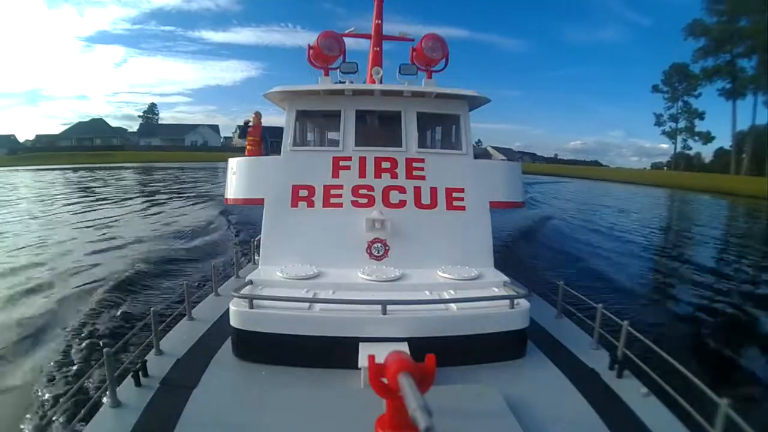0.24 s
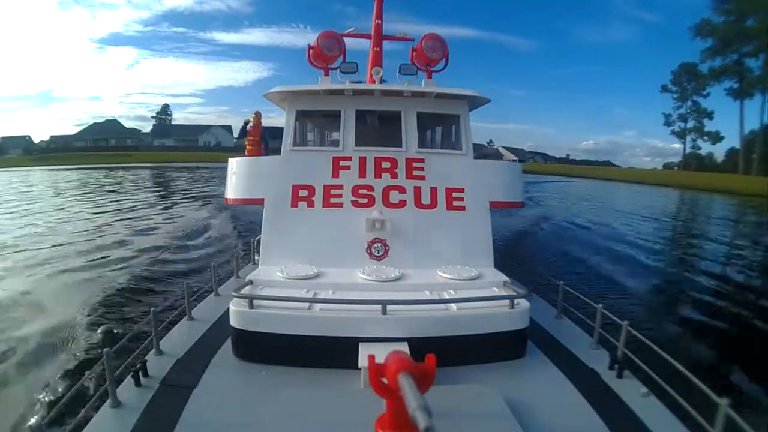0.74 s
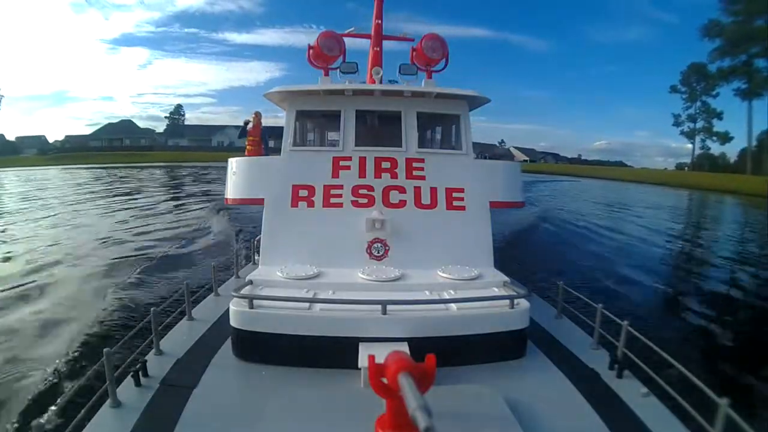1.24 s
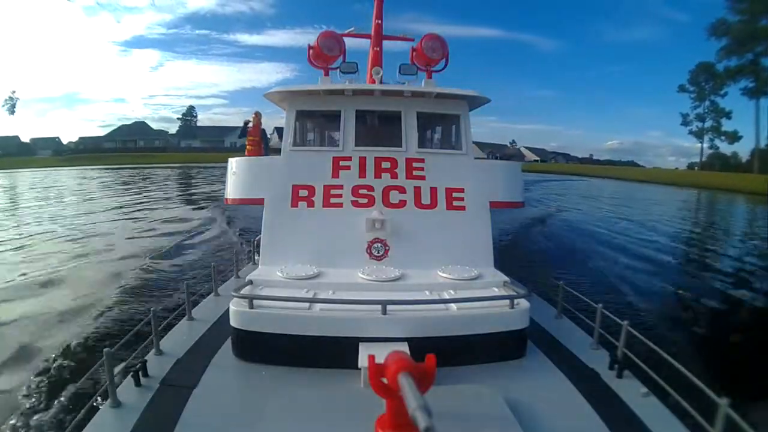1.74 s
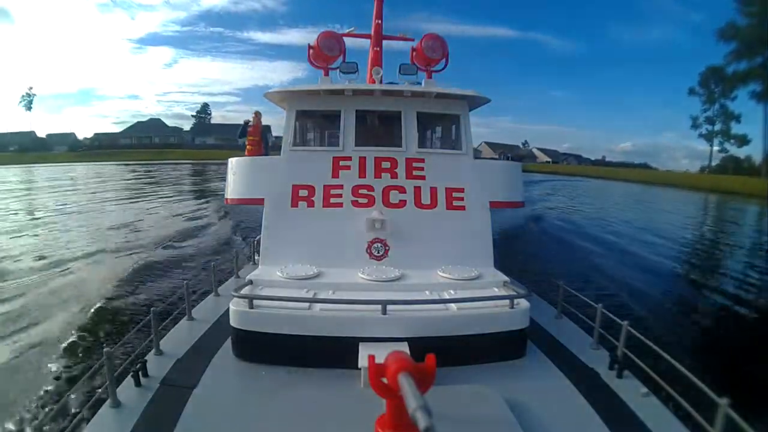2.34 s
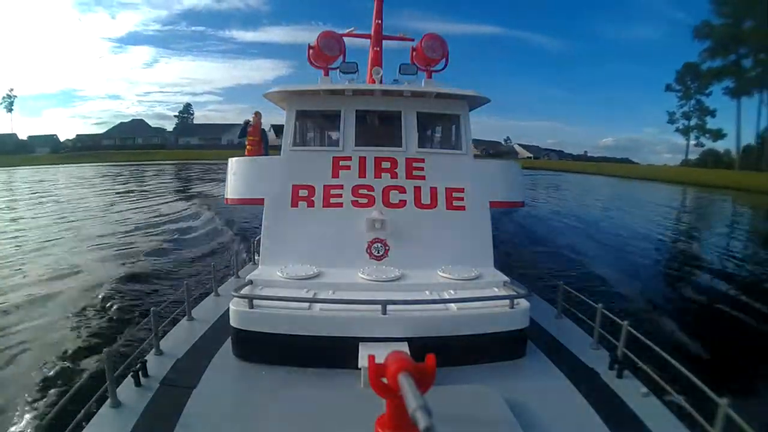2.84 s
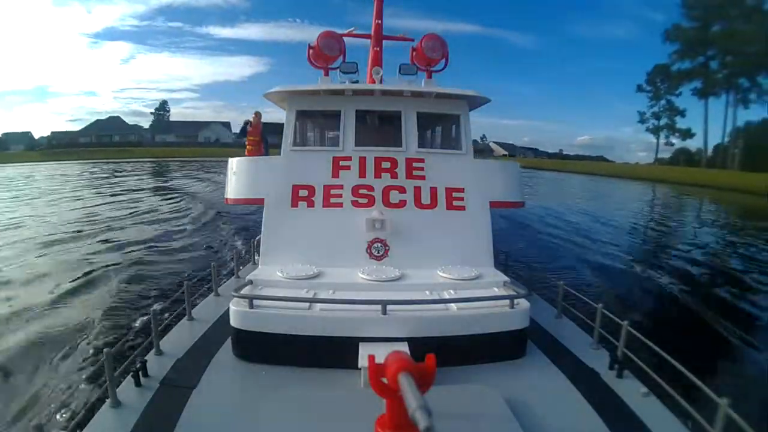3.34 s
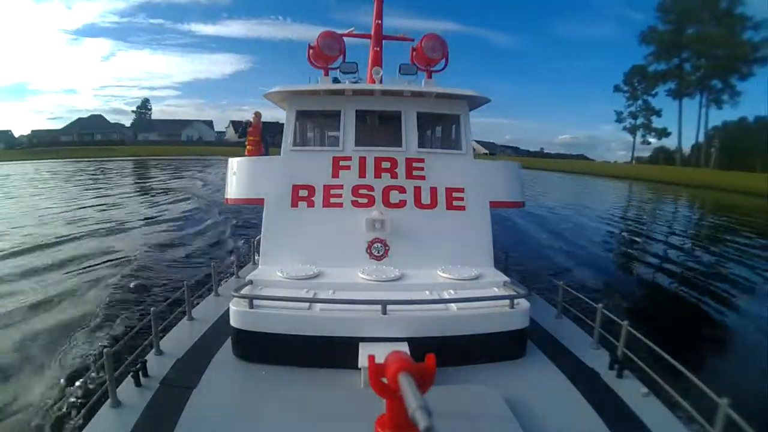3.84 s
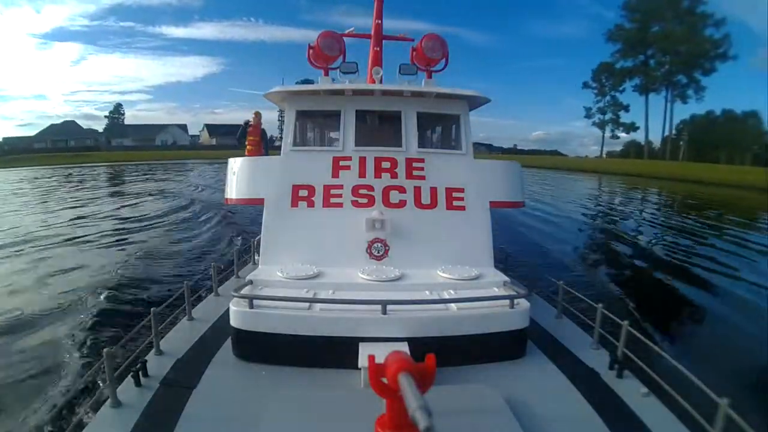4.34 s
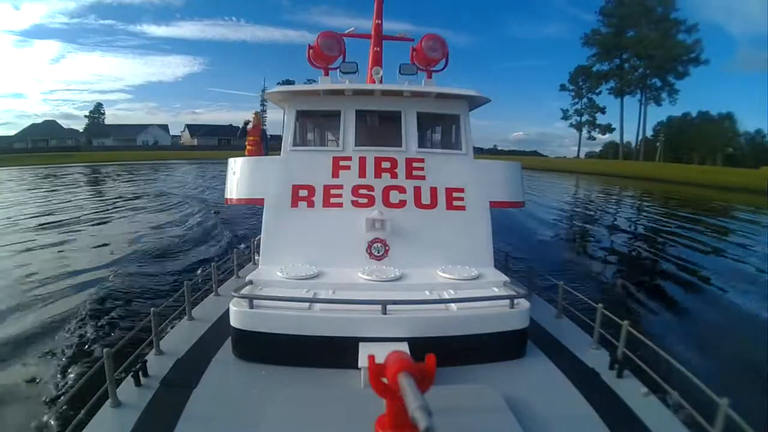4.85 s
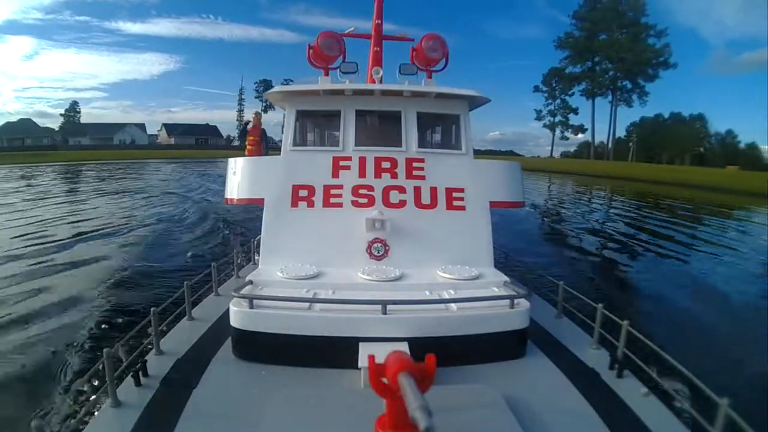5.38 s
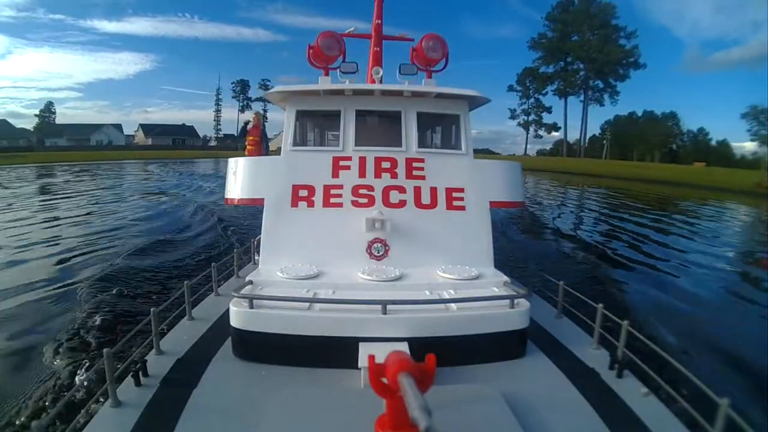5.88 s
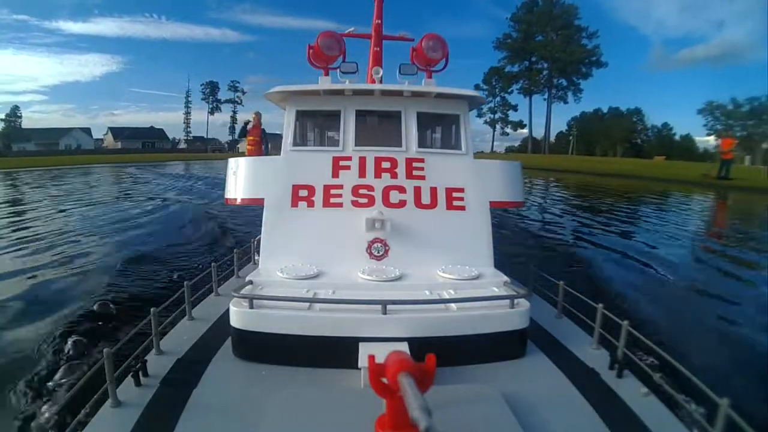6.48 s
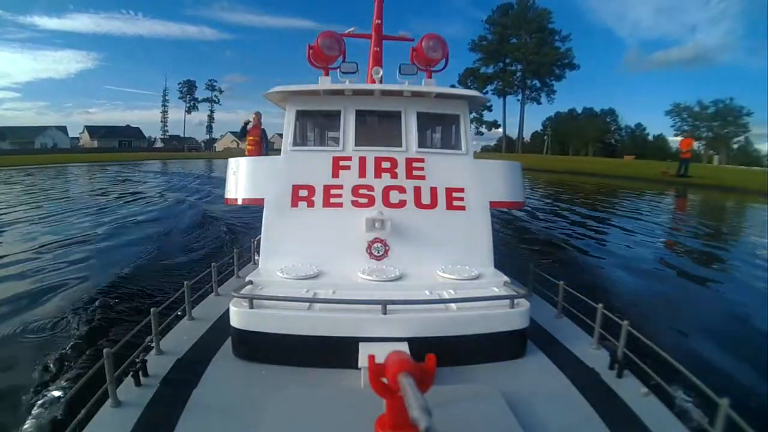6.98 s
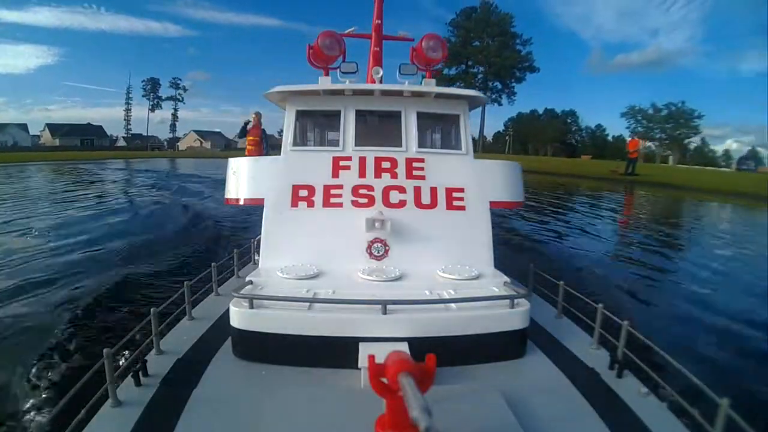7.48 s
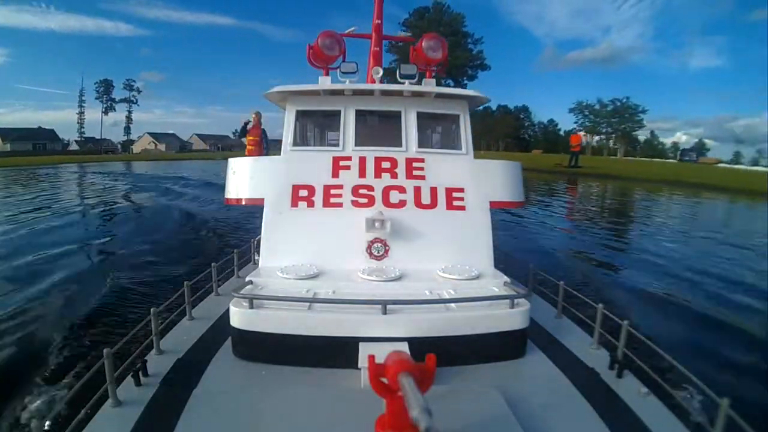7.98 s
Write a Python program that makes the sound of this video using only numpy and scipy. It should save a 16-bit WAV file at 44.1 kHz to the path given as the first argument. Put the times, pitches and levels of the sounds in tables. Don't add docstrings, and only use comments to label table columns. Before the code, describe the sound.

A model rescue boat crosses a pond under continuous electric drive. Its whistle is loudest at the start, then gradually sinks into a dry, fast plastic rattle. The shaft hum rises slightly around two seconds, eases, and lifts again near the end. Scattered hard knocks ring the hull. The enclosed onboard microphone dulls the treble and adds very faint hiss; there is little open-air space.

```python
import sys
import numpy as np
from scipy import signal
from scipy.fft import rfft, irfft, next_fast_len
from scipy.io import wavfile

SR = 44100
rng = np.random.default_rng(int(sys.argv[2]) if len(sys.argv) > 2 else 0)


def wrap_up_sound(samples):
    columns = np.atleast_2d(samples).T
    tamed = np.clip(columns, -1, 1)
    steps = np.round(tamed * 32767).astype(np.int16)
    wavfile.write(sys.argv[1], SR, steps)


def volts(x):
    e = np.asarray(x, float) / 20
    return 10 ** e


N = 362502

# pitch_hz, level_db (per Hz)
HISS_SPECTRUM = [(5900, -25), (6200, -23.5), (6500, -3), (7400, -12), (8100, -13.5), (9200, -6),
                 (10500, -1), (12500, -0.5), (14200, -2.5), (15400, -3.5), (15750, -15)]
# step (line spacings), level_db
SWITCHING_LINES = [(-1.5, -106), (-1.4, -99), (0.24, -90), (3, -93.5), (2.5, -102)]
SWITCH_HZ, SWITCH_STEP_HZ, CREEP_HZ_PER_S = 14780, 92, 2.8
HISS_DB, HISS_SWAY_DB = -79.5, 0.5
HOUSING_STOP_HZ = 6300

# start_s, level_db (peak)
DROPS = [
    (2.6156, -52),
    (4.0, -60),
]
# pitch_hz, level_db (per Hz)
WASH_SPECTRUM = [(20, -38), (45, -41), (130, -24), (260, -23), (480, -18.5), (900, -7.5), (1600, -26.5),
                 (2300, -22), (3400, -15), (4100, -41.5), (5100, -52), (5450, -60), (5800, -79.5)]
WASH_DB = -46
# pitch_hz, width_hz, level_db (under the load curve)
CAN_MODES = [(2697, 129, 0), (3154, 86, -14.5), (3720, 150, -25.5), (4160, 260, -41.5), (4710, 81, -36),
             (5260, 76, -34), (5400, 140, -49.5)]
# pitch_hz, width_hz, level_db (rms)
DECK_MODES = [(61.6, 36, -65.5), (231, 76, -60), (326, 140, -52)]
CAN_DB, CAN_FLICKER_DB = -37.5, 0.57
CAN_FOLLOWS = 0.3
CAN_EASES_FROM, CAN_EASES_DB = 101.6, 1

# start_s, speed (shaft turns per s it settles to)
THROTTLE_NOTCHES = [(0, 88.2), (1.25, 89.4), (1.8, 94.0), (2.03, 97.2), (2.15, 98.4), (2.33, 100.1),
                    (2.57, 103.5), (3.04, 100.5), (3.27, 98.8), (3.86, 97.3), (4.72, 97.9), (4.95, 98.6),
                    (5.3, 99.4), (5.47, 98.7), (5.8, 98.0), (6.35, 97.4), (6.63, 97.9), (6.93, 98.4),
                    (7.53, 100.2), (7.88, 102.3), (8.15, 103.0)]
SPIN_UP_S, SPEED_WANDER = 0.04, 0.12
# start_s, speed (turns per s)
SLOW_SHAFT_SPEED = [(0, 19.32), (1.2, 19.39), (2.0, 20.05), (2.4, 21.02), (2.8, 21.44), (3.2, 20.59),
                    (3.6, 20.09), (4.6, 20.01), (5.6, 20.1), (7.2, 20.11), (7.6, 21.07), (8.22, 21.2)]
# multiple (of the slow shaft), level_db
SLOW_SHAFT_LINES = [(11, -61.5), (15, -74.5), (16, -55.5), (17, -59.5), (18, -55.5)]
# speed (turns per s), once_db, twice_db (per turn), ninth_db (ninth multiple), octave_db (of chop)
SPEED_RESPONSE = [(88, -51.5, -53.5, -69.5, -66.5), (93.5, -49, -49, -73.5, -63),
                  (95.8, -51, -40.5, -51, -61), (97.1, -59, -40.5, -49.5, -56),
                  (98.76, -61.5, -37, -52, -56), (100.1, -56.5, -36, -49.5, -55.5),
                  (103.3, -60, -34, -51, -56)]

# start_s, level_db (chopping tone)
WHISTLE_LEVEL = [
    (0, -29.5),
    (.3, -31.5),
    (1.6, -31),
    (2.65, -34.5),
    (3.4, -37),
    (4.6, -35.5),
    (5.7, -35.5),
    (7.0, -36),
    (7.7, -37),
    (8.22, -39.5),
]
CHOP_HZ = 1943.4
# chop_multiple, shaft_multiple, slow_db (low speed), fast_db (cruise)
CHOP_SIDEBANDS = [(1, -3, -45.5, -43), (1, -2, -71, -63), (1, -1, -57, -58), (1, 2, -55.5, -52),
                  (1, 3, -55, -59.5), (2, -3, -58.5, -58.5), (2, -2, -78, -64.5), (2, 2, -84, -82.5)]

# pitch_hz, width_hz, level_db
HULL_HIGH_MODES = [(1347.8, 145, 3.5), (1278, 220, -13.5), (2370, 350, -27.5), (3012, 83, -21.5),
                   (3357, 100, -20)]
HULL_LOW_MODES = [(1014.8, 41.6, -11.5), (692, 110, -23), (920, 150, -35), (640, 360, -32)]
# start_s, level_db (peak)
HARD_KNOCKS = [(0.0114, -15), (0.695, -18.5), (0.792, -12.5), (1.9561, -12), (2.0842, -12.5),
               (2.137, -17.5), (2.169, -17.5), (2.7184, -13.5), (3.0365, -16.5), (3.5577, -14),
               (3.6597, -16.5), (3.8032, -14), (4.1584, -14.5), (4.354, -15.5), (4.3856, -14.5),
               (4.7551, -15), (4.9182, -13), (5.2553, -15.5), (5.3657, -15.5), (5.8711, -18), (6.5061, -34),
               (6.855, -17), (6.9062, -15.5), (6.9975, -15.5), (7.0296, -15), (7.0593, -16.5),
               (7.3633, -17.5)]
# start_s, double (share of double knocks 0-1), low_db (low hull modes)
COUPLING_SEAT = [
    (0, 1, 3.5),
    (1.76, 1, 2.5),
    (1.86, 0.4, 7),
    (2.2, 0.2, 3.5),
    (4, 0.4, 4),
    (8.22, 0.5, 4),
]
# multiple, twice_db, once_db (under the rattle when doubled, when single)
KNOCK_TONES = [(6, -33.5, -27), (7, -39.5, -24), (9, -23, -43), (10, -23.5, -20), (12, -23, -20)]
# start_s, level_db
COUPLING_PLAY = [(0, -32), (1.7, -31), (2.0, -28), (2.3, -29.5), (3.0, -30.5), (3.5, -30), (4.0, -28.5),
                 (4.6, -30), (4.9, -28), (5.5, -30), (6.3, -29), (7.0, -29), (7.6, -29.5), (8.0, -30.5),
                 (8.22, -29)]
SURGE_DB, SURGES_PER_S = 1.0, 10
# start_s, end_s, grip (0-1)
LOCKED_SPELLS = [(-.05, 0.018, 1), (0.089, 0.23, 0.84), (0.267, 0.42, 0.74), (.51, 0.652, .9),
                 (0.687, 0.95, 0.82), (1.019, 1.196, 0.94), (1.207, 1.284, .35), (1.292, 1.546, 0.9),
                 (1.567, 1.598, 0.5), (1.606, 1.788, 0.73), (1.803, 1.87, 0.25)]
LOCK_RISE_S, LOCK_FALL_S = 0.027, 0.0099
LOCK_RATTLE_DB, LOCK_CAN_DB = 7.5, 3
# multiple (of the shaft), level_db (re the common beat level)
LOCKED_TONES = [(6, -7.5), (8, 1.5), (10, -3.5), (12, 6), (17, 0)]
LOCKED_DB, UNLOCKED_DB = -43, -65


def rms_one(x):
    return x / np.sqrt(np.mean(x ** 2) + 1e-20)


def in_time(rows):
    s, *columns = np.transpose(rows)
    return [np.interp(np.arange(N) / SR, s, c) for c in columns]


def drift(rate):
    r = np.exp(-64 * np.pi * rate / SR)
    draws = rng.standard_normal(N // 32 + 2002)
    slow = signal.lfilter([1], [1, -2 * r, r * r], draws)[2000:]
    return np.interp(np.arange(N) / 32, np.arange(len(slow)), rms_one(slow))


def resonance(x, hz, width):
    r = np.exp(-np.pi * width / SR)
    return rms_one(signal.lfilter([1, 0, -1], [1, -2 * r * np.cos(2 * np.pi * hz / SR), r * r], x))


def body(x, modes, skirt=1.31):
    return sum(volts(db) * resonance(resonance(x, hz, skirt * width), hz, width) for hz, width, db in modes)


def coloured(spectrum):
    hz, level_db = np.transpose(spectrum)
    size = next_fast_len(N)
    grid = np.log(np.maximum(np.arange(size // 2 + 1) * SR / size, 1))
    shape = volts(np.interp(grid, np.log(hz), level_db, left=-99, right=-99))
    return rms_one(irfft(rfft(rng.standard_normal(size)) * shape, size)[:N])


def tone(turns, level_db, flutter_db=0.5):
    level = np.sqrt(2) * volts(level_db + flutter_db * drift(18))
    return level * np.sin(2 * np.pi * (turns + rng.random()))


def circuit_noise():
    t = np.arange(N) / SR
    switching = 0
    for step, db in SWITCHING_LINES:
        hz = SWITCH_HZ + step * SWITCH_STEP_HZ + CREEP_HZ_PER_S * t / 2
        switching = switching + tone(hz * t, db)
    return volts(HISS_DB + HISS_SWAY_DB * drift(0.6)) * coloured(HISS_SPECTRUM) + switching


def droplets():
    t = np.arange(N) / SR
    splash = resonance(rng.standard_normal(N), 4300, 970)
    swell = sum(volts(db + 3.5) * np.exp(-((t - s - 0.002) / 0.0034) ** 2) for s, db in DROPS)
    return swell * resonance(splash, 4300, 970)


def brushes(turns, per_s, locked):
    beat = 1 + 0.5 * np.cos(2 * np.pi * turns)
    rub = beat * volts(0.11 * drift(40)) * rng.standard_normal(N)
    play_db, = in_time(COUPLING_PLAY)
    load_db = CAN_DB + LOCK_CAN_DB * locked + CAN_FLICKER_DB * drift(16)
    load_db = load_db + CAN_FOLLOWS * (play_db - play_db.mean())
    load_db = load_db - CAN_EASES_DB * np.maximum(per_s - CAN_EASES_FROM, 0)
    wash = volts(WASH_DB + 1.5 * drift(6.7)) * coloured(WASH_SPECTRUM)
    return volts(load_db) * body(rub, CAN_MODES) + body(rub, DECK_MODES) + wash


def shaft_speed():
    s, goal = np.transpose(THROTTLE_NOTCHES)
    held = goal[np.searchsorted(s, np.arange(N) / SR, side="right") - 1]
    r = np.exp(-1 / (SPIN_UP_S * SR))
    return goal[0] + signal.lfilter([1 - r], [1, -r], held - goal[0]) + SPEED_WANDER * drift(3)


def by_speed(per_s):
    speed, *columns = np.transpose(SPEED_RESPONSE)
    return [np.interp(per_s, speed, c) for c in columns]


def shaft_hum(turns, slow_turns, once_db, twice_db, ninth_db):
    hum = tone(turns, once_db, flutter_db=1.0) + tone(2 * turns, twice_db, flutter_db=0.5)
    commutator = tone(9 * turns, ninth_db, flutter_db=1.0)
    slow_lines = sum(tone(k * slow_turns, db, flutter_db=0.0) for k, db in SLOW_SHAFT_LINES)
    return hum + commutator + slow_lines


def controller(turns, per_s, octave_db):
    chop = np.cumsum(CHOP_HZ + 0.82 * drift(2.2)) / SR
    fast = np.clip((per_s - 89) / 8, 0, 1)
    whistle = tone(chop, in_time(WHISTLE_LEVEL)[0] + 0.47 * drift(5.2), flutter_db=0.6)
    octave = tone(2 * chop, octave_db + 2.3 * drift(2.3))
    sides = 0
    for m, k, slow_db, fast_db in CHOP_SIDEBANDS:
        level_db = slow_db + fast * (fast_db - slow_db)
        sides = sides + tone(m * chop + k * turns, level_db, flutter_db=1.0)
    return whistle + octave + sides


def grip():
    t = np.arange(N) / SR
    locked = 0
    for start, end, firm in LOCKED_SPELLS:
        rise, fall = (t - start) / LOCK_RISE_S, (end - t) / LOCK_FALL_S + 1
        locked = locked + firm * np.clip(np.minimum(rise, fall), 0, 1)
    return locked


def locked_beat(turns, locked):
    beat_db = UNLOCKED_DB + (LOCKED_DB - UNLOCKED_DB) * np.sqrt(np.clip(locked, 0, 1))
    return sum(tone(k * turns, beat_db + db, flutter_db=1.0) for k, db in LOCKED_TONES)


def jolts():
    pushes, t = np.zeros(N), np.arange(600) / SR
    for s, db in HARD_KNOCKS:
        pushes[round((s + 0.0002) * SR)] = volts(db - 0.5)
    main_modes = (HULL_HIGH_MODES[0], HULL_LOW_MODES[0])
    rings = sum(volts(db) * np.sin(2 * np.pi * hz * t) for hz, width, db in main_modes)
    rings = rings * (t * np.exp(-t / 0.0016)) ** 1.5
    return np.convolve(pushes, rings / np.abs(rings).max())[:N]


def slack():
    t = np.arange(N) / SR
    gap = np.min(np.abs(t[::32, None] - np.array(HARD_KNOCKS)[:, 0]), axis=1)
    return np.interp(t, t[::32], 1 - 0.75 * np.exp(-(gap / 0.006) ** 2))


def knocks(turns, double, scrape=0.71, depth=0.7, uneven_db=2.5, jitter=0.035):
    count = int(2 * turns[-1])
    late, force, sign = rng.standard_normal((3, count))
    at = np.searchsorted(turns, np.arange(count) / 2 + 0.1014 + jitter * late).clip(0, N - 1)
    strength = volts(uneven_db * (1 - 0.5 * double[at]) * np.clip(force, -2, 1.3))
    half_turn = np.where(np.arange(count) % 2, double[at], 1)
    taps = np.zeros(N)
    taps[at] = strength * half_turn * np.sign(sign + 0.6)
    swell = 1 + depth * (1 - 1.1 * double) * np.cos(2 * np.pi * (turns - 0.1))
    return rms_one(taps) + scrape * swell * rng.standard_normal(N)


def rattle(turns, slow_turns, locked):
    level_db = in_time(COUPLING_PLAY)[0] + LOCK_RATTLE_DB * locked + SURGE_DB * drift(SURGES_PER_S)
    double, low_db = in_time(COUPLING_SEAT)
    double = np.clip(double, 0, 1)
    shared = knocks(turns, double) * (1 + 0.16 * np.cos(2 * np.pi * slow_turns))
    hull = body(shared, HULL_HIGH_MODES) + volts(low_db) * body(shared, HULL_LOW_MODES)
    lines = 0
    for k, twice_db, once_db in KNOCK_TONES:
        lines = lines + tone(k * turns, double * twice_db + (1 - double) * once_db, flutter_db=5.0)
    return volts(level_db - 3.0) * (hull + lines)


def scene():
    per_s, locked = shaft_speed(), grip()
    turns = np.cumsum(per_s) / SR
    slow_turns = np.cumsum(in_time(SLOW_SHAFT_SPEED)[0]) / SR
    once_db, twice_db, ninth_db, octave_db = by_speed(per_s)
    hull = droplets() + brushes(turns, per_s, locked)
    hull = hull + shaft_hum(turns, slow_turns, once_db, twice_db, ninth_db)
    hull = hull + controller(turns, per_s, octave_db)
    hull = hull + locked_beat(turns, locked) + jolts()
    hull = hull + slack() * rattle(turns, slow_turns, locked)
    housing = signal.cheby2(10, 60, HOUSING_STOP_HZ, fs=SR, output="sos")
    run_in = 600
    return signal.sosfilt(housing, np.r_[hull[run_in:0:-1], hull])[None, run_in:]


def top_cut(x):
    return signal.sosfilt(signal.butter(12, 15720, fs=SR, output="sos"), x)


def record(dry):
    return top_cut(dry + circuit_noise())


dry = scene()
out = record(dry)
wrap_up_sound(out)
```